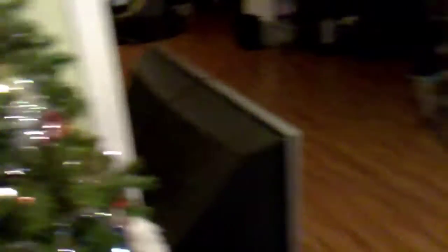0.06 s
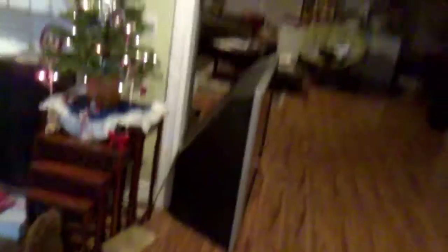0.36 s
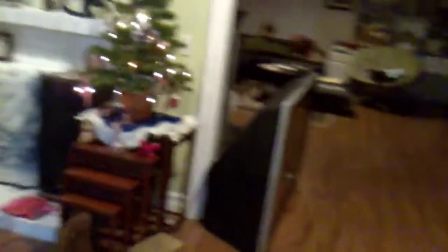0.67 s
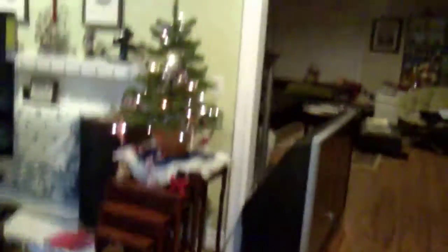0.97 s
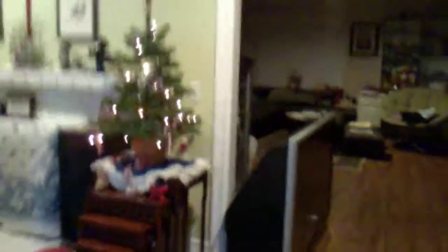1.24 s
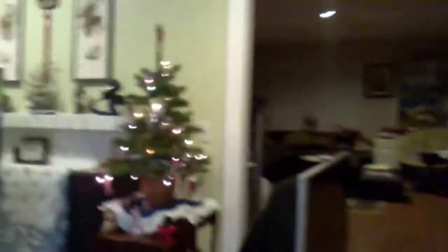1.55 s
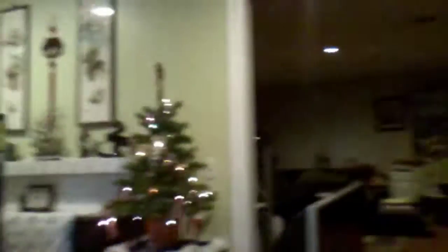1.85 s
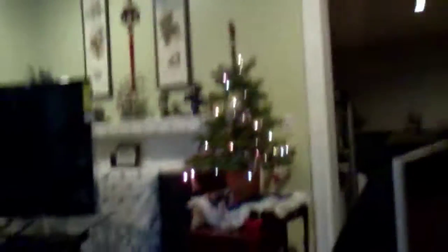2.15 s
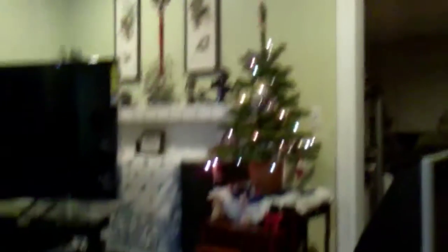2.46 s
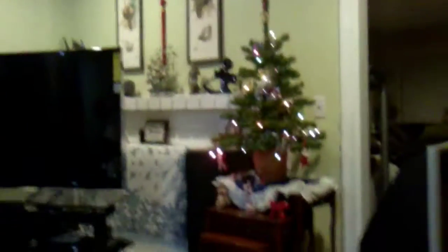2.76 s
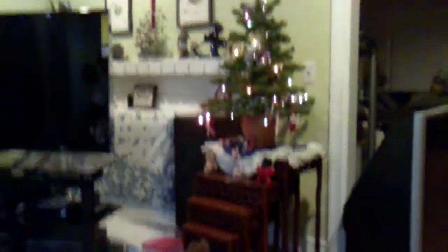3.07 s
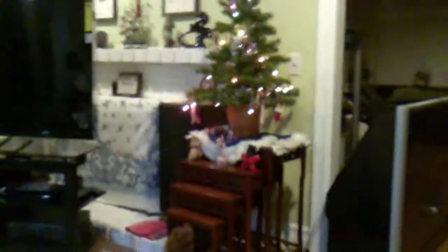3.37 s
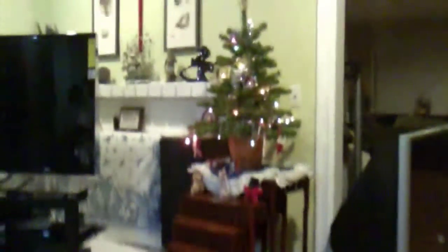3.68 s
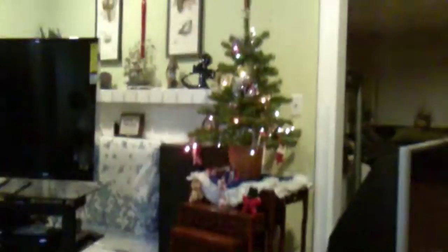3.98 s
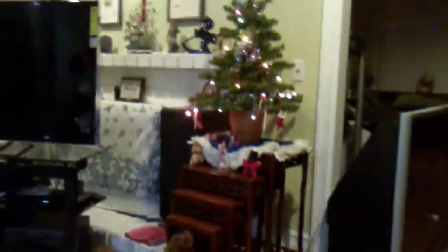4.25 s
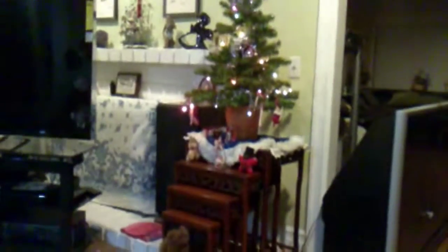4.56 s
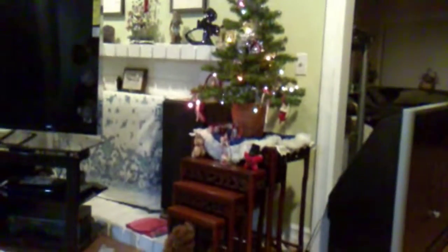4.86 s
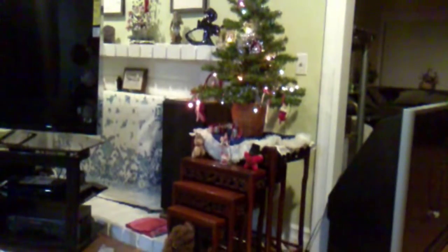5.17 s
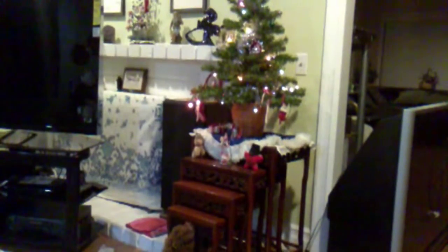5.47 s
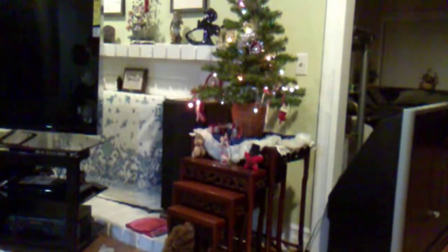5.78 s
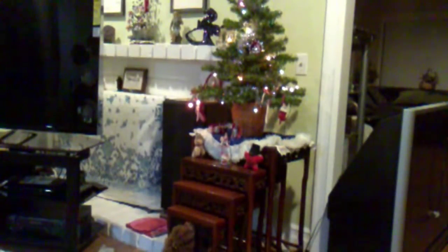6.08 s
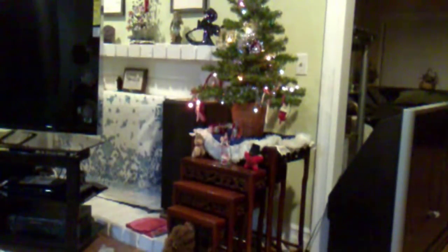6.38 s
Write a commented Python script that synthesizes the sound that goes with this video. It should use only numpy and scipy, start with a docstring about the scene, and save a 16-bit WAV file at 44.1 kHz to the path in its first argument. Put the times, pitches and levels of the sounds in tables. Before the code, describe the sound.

Close handling noise on a small camera: sharp plastic clicks, creaks, skin rubbing and soft bumps, fading to faint hiss.

```python
"""The plastic case of a small camera creaks and snaps as fingers shift their grip in a quiet room.
Each time a seam sticks and lets go, it taps the case and makes it ring; a loose part ticks at the start.
Skin slides over the case with a grainy rub, a hiss and a low rumble, and soft bumps of the hand push
on the microphone inside. Then the hand comes to rest and only a faint hiss is left."""
import sys
import numpy as np
from scipy import signal
from scipy.fft import rfft, irfft
from scipy.io import wavfile

SR = 44100
rng = np.random.default_rng(int(sys.argv[2]) if len(sys.argv) > 2 else 0)


def output_pcm(signal):
    """Save a mono or channel-first signal as 16-bit PCM at the path in sys.argv[1].

    Samples are clipped to [-1, 1] before scaling.
    """
    pcm = np.clip(np.atleast_2d(signal).T, -1, 1) * 32767
    wavfile.write(sys.argv[1], SR, np.round(pcm).astype(np.int16))


N = 283465

# Levels in the tables are relative: the functions scale and filter them further.
# tone colour of the still room with the microphone's own hiss: f/Hz, level/dB
STILL_SPECTRUM = [(20, 1.5), (60, -17), (150, -17), (260, -17.5), (430, -21.5), (750, -24), (1150, -23),
                  (1500, -28), (3000, -29.5), (8000, -29), (16000, -27.5)]
# tone colour of the grip's rumble: f/Hz, level/dB
GRIP_SPECTRUM = [(20, -4), (40, 1), (90, 1), (150, -4), (230, -7.5), (340, -12), (600, -37)]
# tone colour of sliding skin: f/Hz, level/dB
SKIN_SPECTRUM = [(1200, -17.5), (2200, -0.5), (3000, -1.5), (4200, -4), (5200, -5), (7000, -7), (9000, -9),
                 (10800, -10.5), (13000, -13.5), (16000, -22.5)]
# the holding hand, until it comes to rest: t/s, rub level/dB, rumble level/dB
HOLDING_HAND = [(0.0, -85, -83), (0.45, -73, -68), (0.8, -55.5, -50), (1.2, -64.5, -76), (2.0, -60.5, -63),
                (2.82, -71, -69.5), (3.35, -78, -60), (3.8, -77, -66.5), (4.35, -69.5, -60.5),
                (5.0, -74.5, -75), (5.5, -89.5, -85)]
# strokes of a finger over the case: start t/s, length/s, rub level/dB, hiss level/dB
FINGER_STROKES = [(0.174, 0.037, -59, -74), (0.256, 0.054, -58.5, -68), (0.528, 0.084, -57, -61.5),
                  (0.663, 0.28, -50, -59), (0.733, 0.079, -43.5, -79), (0.959, 0.038, -47.5, -50),
                  (1.006, 0.056, -46, -68), (1.054, 0.039, -51, -42.5), (1.106, 0.068, -49.5, -47),
                  (1.175, 0.29, -57, -55.5), (1.523, 0.055, -37.5, -41.5), (1.586, 0.15, -54, -46),
                  (1.624, 0.068, -38.5, -47.5), (1.776, 0.052, -51, -53.5), (1.878, 0.18, -43.5, -55),
                  (1.919, 0.028, -61, -47.5), (2.005, 0.03, -44.5, -47.5), (2.072, 0.21, -47.5, -55),
                  (2.348, 0.066, -49.5, -64), (2.436, 0.12, -44.5, -54), (2.665, 0.046, -49, -57.5),
                  (2.738, 0.041, -54, -60), (2.923, 0.028, -57, -71), (3.305, 0.024, -62, -70.5),
                  (3.534, 0.023, -47, -60), (3.559, 0.11, -57.5, -59.5), (3.87, 0.14, -58, -71),
                  (4.095, 0.034, -65.5, -72), (4.167, 0.018, -56, -64), (4.396, 0.07, -71, -92),
                  (4.76, 0.074, -61.5, -66), (4.813, 0.032, -59, -72), (4.92, 0.035, -71.5, -75),
                  (5.125, 0.027, -66.5, -68), (5.204, 0.04, -70, -72)]
# soft bumps of the hand: t/s, level/dB, f/Hz, swell time/s
HAND_BUMPS = [(0.262, -41, 59, 0.0039), (0.412, -44, 51, 0.008), (0.829, -33.5, 75.4, 0.0051),
              (0.958, -31.5, 41.3, 0.0079), (1.524, -17, 43, 0.013), (1.935, -35, 90, 0.0038),
              (3.467, -28, 90, 0.0067), (3.491, -36.5, 76.9, 0.012), (3.959, -44, 124.5, 0.0047),
              (4.368, -42, 80, 0.0045), (4.615, -44, 114, 0.006), (4.694, -43.5, 120, 0.0075),
              (5.224, -43.5, 123, 0.0054), (5.782, -43, 406, 0.00088), (5.782, -55.5, 236, 0.0074)]
# squeaky rasps of dry skin: start t/s, end t/s, f/Hz, width/Hz, level/dB
SKIN_RASPS = [(1.042, 1.122, 4170, 804, -50.5), (1.128, 1.245, 4180, 800, -56.5),
              (1.307, 1.5, 10500, 2190, -64), (1.649, 1.767, 3580, 604, -48.5),
              (1.643, 1.743, 10900, 1200, -56), (1.789, 1.849, 11100, 2485, -63)]
# the pitches at which the case rings (its modes; wider ones die sooner): f/Hz, width/Hz, level/dB
CASE_MODES = [(120, 198, -4), (336, 350, -6.5), (686, 182, 1.5), (1137, 240, 0.5), (1600, 614, -4),
              (2415, 680, -3.5), (3880, 1300, -7.5), (5960, 4200, -13.5), (10700, 3300, -14.5)]
# ticks of a loose part: t/s
TICK_TIMES = [0.0433, 0.077, 0.1496, 0.2258, 0.2739, 0.292, 0.3098, 0.3283, 0.3663, 0.3993, 0.4358, 0.4773,
              0.4963]
# slips of a stiff catch: t/s, level/dB
CATCH_SLIPS = [(0.888, -17.5), (2.1363, -19), (2.146, -16), (2.1501, -18), (2.1638, -24), (2.1883, -13),
               (2.2422, -18.5), (2.3547, -5.5), (2.367, -11), (2.3767, -7.5), (2.3853, -7.5), (2.542, -17),
               (2.9508, -31.5), (4.37, -25)]
# Sharpness, below, is the frequency above which a tap loses its treble.
# dry clicks of the seam: t/s, level/dB, sharpness/Hz
SEAM_CLICKS = [(0.91, -2, 3200), (1.1566, -4, 9000), (1.3168, -7.5, 1600), (1.4978, -12.5, 3120),
               (1.8345, 4, 7040), (1.877, -4.5, 7800), (2.0886, -1.5, 6800), (2.564, -3, 4300),
               (2.6142, -12, 6700), (3.0069, -8, 5500), (3.028, 6.5, 4700), (3.3875, -20, 5500),
               (3.4529, -10, 10000), (3.4903, 4, 9200), (3.6418, 3, 4700), (3.6791, -3.5, 2200),
               (3.7248, -14.5, 4800), (3.8623, 6.5, 5330), (4.05, -4, 4280), (4.154, -2.5, 5200),
               (4.2782, 0, 4900), (4.3081, -1.5, 4500), (4.4794, -0.5, 4200), (4.534, -3, 3500),
               (4.696, -24, 3000)]
# creaks, quick runs of slips:
# start t/s, end t/s, first slip rate/Hz, last slip rate/Hz, level/dB, sharpness/Hz, favoured f/Hz
SEAM_CREAKS = [(0.77, 0.805, 160, 140, -13, 3970, 2696), (1.243, 1.266, 233, 310, -15.5, 1480, 900),
               (1.573, 1.579, 81, 100, -21, 6000, 2400), (1.667, 1.704, 132, 130, -6, 3000, 500),
               (1.886, 1.908, 110, 135, -14, 6000, 1700), (2.094, 2.128, 119, 117, -7.5, 7640, 4030),
               (2.432, 2.515, 107, 98, -6.5, 4640, 2614), (3.134, 3.189, 76, 65, -29, 4500, 2580),
               (4.397, 4.438, 107, 130, -27.5, 3960, 1000), (4.44, 4.47, 115, 130, -21.5, 4800, 2700),
               (4.478, 4.517, 110, 85, -26.5, 4880, 2800)]
# snaps and hollow knocks around the case:
# t/s, level/dB, sharpness/Hz, favoured f/Hz, its boost/dB, bass boost from flexing/dB
CASE_SNAPS = [(0.627, -2.5, 1974, 560, 4.5, 3.5), (0.6536, -2, 4090, 590, 12, 11.5),
              (0.675, 7, 7000, 1540, 14.5, 13), (0.678, -1.5, 2000, 744, 13, 3.5),
              (0.695, -11, 3000, 800, 9.5, 4.5), (0.714, 14.5, 2500, 410, 10, 3.5),
              (0.7181, -2.5, 7150, 520, 14, 11), (0.7294, 7.5, 2860, 555, 10, 8.5),
              (0.7377, -8, 5880, 820, 12, 20), (0.829, 5, 9500, 4830, 4.5, -3),
              (0.879, -5.5, 2890, 2740, 10, -3), (0.9573, 11, 9910, 910, 10.5, 0),
              (1.5462, -1.5, 12100, 2140, 1, 8), (1.5538, 2, 12160, 1080, 1, 7),
              (1.5604, 4, 4680, 1640, 10.5, 6), (1.6164, -0.5, 8780, 450, 10, -10),
              (1.6514, 1, 5700, 523, 9.5, 11), (2.129, -1.5, 2170, 646, 11, -7),
              (2.3398, -3.5, 1040, 850, 15, 15), (2.4232, 11, 10700, 2744, 6, -5),
              (2.4485, -6, 3910, 890, 15, -4), (2.5248, 5, 5800, 2450, 7, -5),
              (2.678, -2.5, 3970, 900, 7.5, -13), (3.4136, -21.5, 4940, 580, 5, 11),
              (3.4675, 9.5, 5800, 4500, 10, 3), (3.4673, 10.5, 1500, 800, 6, 7.5),
              (3.6601, 3.5, 13290, 530, 6.5, 9), (3.662, -10, 9550, 4600, 21.5, 13),
              (3.9568, -5, 8200, 890, 6, 9), (3.959, -1.5, 2960, 530, 10, 3.5),
              (4.607, -16, 6250, 784, 8, 9.5), (4.613, -15, 10220, 657, 8, 15),
              (4.7637, 7.5, 930, 595, 4, 5.5), (5.2273, -26.5, 2302, 798, 13.5, 13),
              (5.783, -31.5, 1014, 443, 13.5, 16)]


def from_db(db):
    """Turn decibels into a factor to multiply by."""
    return 10 ** (np.asarray(db) / 20)


def cut(x, hz, kind, order=2):
    """Filter a sound, keeping the "low" part or a "band"."""
    return signal.sosfilt(signal.butter(order, np.clip(hz, 10, .45 * SR), kind, fs=SR, output="sos"), x)


def rms_one(x):
    """Scale a sound so that its average size (rms) is 1."""
    return x / np.sqrt(np.mean(x ** 2) + 1e-20)


def band_one(x, band_hz):
    """Scale a sound so that the part inside one band has rms 1."""
    return x / np.std(cut(x, band_hz, "band", order=3))


def drift(per_s):
    """A wandering curve of rms 1 that heads for a new random value per_s times a second."""
    targets = rng.standard_normal(N // 20)
    return rms_one(np.interp(np.arange(N) / SR * per_s, np.arange(len(targets)), targets))


def coloured(noise, spectrum):
    """Give a noise the tone colour in a table, at rms 1."""
    hz, db = np.transpose(spectrum)
    bin_hz = np.maximum(np.fft.rfftfreq(N, 1 / SR), 1)
    gain = from_db(np.interp(np.log(bin_hz), np.log(hz), db))
    return rms_one(irfft(rfft(noise) * gain, N))


def add(out, start_s, sound):
    """Mix a short sound in at a given time."""
    at = int(round(start_s * SR))
    out[at:at + len(sound)] += sound[:N - at]


def still_room():
    """The quiet room and the microphone's own hiss make a faint, steady noise."""
    return from_db(-66.5) * coloured(rng.standard_normal(N), STILL_SPECTRUM)


def wall_echo(sound, fade_s=0.16, level_db=-27):
    """A faint, dull tail comes back from the walls, falling by 60 dB in fade_s."""
    t = np.arange(SR // 2) / SR
    tail = rng.standard_normal(len(t)) * from_db(-60 * t / fade_s) * (t > .006)
    tail = cut(tail / np.sqrt(np.sum(tail ** 2)), [400, 6000], "band", order=1)
    return from_db(level_db) * signal.fftconvolve(sound, tail)[:N]


def hand_bumps():
    """Soft flesh presses on the case slowly: a few low waves swell and die."""
    out, t = np.zeros(N), np.arange(SR // 6) / SR
    for start, db, hz, swell_s in HAND_BUMPS:
        envelope = (t / swell_s * np.exp(1 - t / swell_s)) ** 2
        add(out, start, from_db(db) * envelope * np.sin(2 * np.pi * hz * t))
    return out


def stroke_envelope(length_s, rise_s=0.0087, ease_db_per_s=14.5, lift_db_per_s=450.5):
    """Loudness of one stroke: a finger starts to slide at once, eases a little, then lifts."""
    t = np.arange(SR // 2) / SR
    loss_db = ease_db_per_s * t + lift_db_per_s * np.maximum(t - length_s, 0)
    return np.minimum(t / rise_s, 1) * from_db(-loss_db)


def hand_movement(skid_s=0.014):
    """How strong rub, hiss and rumble are over time: holding, strokes and skids add up in power."""
    times, *levels = np.transpose(HOLDING_HAND)
    hold, grip = [from_db(np.interp(np.arange(N) / SR, times, db)) for db in levels]
    rub_power, hiss_power = hold ** 2, (hold * from_db(-5)) ** 2
    # after each seam click the finger skids on: a tiny stroke, far softer than the click
    skids = [(start, skid_s, db - 58, db - 66.5) for start, db, _ in SEAM_CLICKS]
    for start, length_s, rub_db, hiss_db in FINGER_STROKES + skids:
        envelope = stroke_envelope(length_s)
        add(rub_power, start, (from_db(rub_db) * envelope) ** 2)
        add(hiss_power, start, (from_db(hiss_db) * envelope) ** 2)
    rub, hiss = np.sqrt(rub_power), np.sqrt(hiss_power)
    shake = from_db(-52) * (rub / from_db(-50)) ** 0.8   # harder rubbing adds more rumble
    return rub, hiss, np.hypot(grip, shake)


def friction(slips_per_s, spread_db, drag_share):
    """The force of sliding: tiny slips of uneven size over the even noise of dragging."""
    sizes = from_db(spread_db * np.minimum(rng.exponential(1, N), 3)) * rng.choice([-1, 1], N)
    slipping = rng.random(N) < slips_per_s / SR
    return rms_one(sizes * slipping) + drag_share * rng.standard_normal(N)


def finger_echo(sound, delay_s=.0003, echo_share=0.2):
    """Sound bounces off the finger over the microphone hole; as the gap moves, the colour shifts."""
    now = np.arange(N)
    lag = delay_s * SR * np.exp(0.27 * drift(per_s=12))
    return sound + echo_share * np.interp(now - lag, now, sound)


def sliding_skin(rub, hiss, rumble, unsteady_db=1.5):
    """Sliding skin rings the case, hisses over the microphone hole and shakes the whole camera."""
    pressure = from_db(unsteady_db * drift(per_s=110))
    coarse_force = friction(slips_per_s=550, spread_db=3.0, drag_share=.4)
    grains = signal.fftconvolve(coarse_force, case_ring(flex_db=-0.5, detune=0))[:N]
    grains = band_one(cut(grains, 4500, "low"), [500, 2500])
    fine_force = friction(slips_per_s=6500, spread_db=8.0, drag_share=1.2)
    skin = finger_echo(coloured(fine_force, SKIN_SPECTRUM))
    skin = band_one(skin, [4500, 14000])
    grip = coloured(rng.standard_normal(N), GRIP_SPECTRUM)
    return from_db(-2.75) * pressure * rub * grains + from_db(-3.13) * hiss * skin + rumble * grip


def skin_rasps():
    """Dry skin catches and flutters: a narrow band of noise swells and fades."""
    out = np.zeros(N)
    for start, end, hz, width, db in SKIN_RASPS:
        flutter = rms_one(cut(rng.standard_normal(SR // 2), [hz - width / 2, hz + width / 2], "band"))
        swell = signal.windows.tukey(int((end - start) * SR), .5)
        add(out, start, from_db(db) * swell * flutter[:len(swell)])
    return out


def case_ring(flex_db, detune, flex_below_hz=500):
    """After one tap the case rings at several fading pitches; flexing sets how strong the low ones are."""
    t = np.arange(SR // 20) / SR
    hz, width, db = np.transpose(CASE_MODES)[:, :, None]
    gain = from_db(db + flex_db * (hz < flex_below_hz)) * 2 * np.pi * width / SR
    gain[1::2] *= -1   # flipping every other mode makes the lows arrive a little late
    hz = hz * np.exp(detune * rng.standard_normal(hz.shape))   # the grip shifts the pitches each time
    return np.sum(gain * np.exp(-np.pi * width * t) * np.sin(2 * np.pi * hz * t), axis=0)


def snap(db, sharp_hz, spot_hz, spot_db, flex_db, chatter_s=0.0031):
    """A seam lets go in one push, then chatters briefly; the spot that slips favours one pitch."""
    t = np.arange(SR // 50) / SR
    push = cut(1.0 * (t == 0), 8000, "low", order=1)
    chatter = from_db(-28) * rng.standard_normal(len(t)) * np.exp(-t / chatter_s)
    ring = signal.fftconvolve(push + chatter, case_ring(flex_db, detune=.05))
    narrowness = np.clip(6800 / spot_hz, 2, 5.5)   # plastic damps high pitches faster
    spot = signal.lfilter(*signal.iirpeak(spot_hz, narrowness, fs=SR), ring)
    boosted = ring + (from_db(spot_db) - 1) * spot
    return from_db(db) * cut(boosted, sharp_hz, "low", order=3)


def skin_crackles(rub, per_s=18):
    """Now and then sliding skin catches and flicks the case, harder under a harder rub."""
    out, seconds = np.zeros(N), N / SR
    for when, size, spot in rng.random((int(per_s * seconds), 3)):
        db = 32.5 + (2 * size - 1)   # relative to the rub
        spot_hz = 1400 * 2 ** (2 * spot - 1)   # up to an octave either way
        flick = snap(db, sharp_hz=5500, spot_hz=spot_hz, spot_db=4.0, flex_db=5.0)
        add(out, when * seconds, rub[int(when * N)] * flick)
    return out


def loose_part_ticks(full_at_s=0.38, growth_db_per_s=53):
    """A loose part ticks against the case, harder each time until it is at full strength."""
    out = np.zeros(N)
    for start in TICK_TIMES:
        db = -11 - growth_db_per_s * max(full_at_s - start, 0)
        add(out, start, snap(db, sharp_hz=6700, spot_hz=6600, spot_db=5.5, flex_db=-0.5))
    return out


def stiff_catch():
    """A stiff catch slips and rings at one bright pitch."""
    out = np.zeros(N)
    for start, db in CATCH_SLIPS:
        add(out, start, snap(db, sharp_hz=8060, spot_hz=2775, spot_db=21.0, flex_db=3.0))
    return out


def seam_clicks(hollow_hz=3700, hollow_depth=0.5):
    """The seam barely stirs one of the case's pitches, so its clicks sound hollow and boxy."""
    out = np.zeros(N)
    for start, db, sharp_hz in SEAM_CLICKS:
        click = snap(db, sharp_hz, spot_hz=1950, spot_db=4.5, flex_db=1.0)
        weak_band = signal.lfilter(*signal.iirpeak(hollow_hz, Q=1.3, fs=SR), click)
        add(out, start, click - hollow_depth * weak_band)
    return out


def seam_creaks(uneven_db=2.5, jitter=0.049):
    """Under a steady load a seam sticks and lets go at an almost even rate."""
    out = np.zeros(N)
    for start, end, first_rate, last_rate, db, sharp_hz, spot_hz in SEAM_CREAKS:
        now = start
        for size, delay in rng.standard_normal((16, 2)):
            if now < end:
                add(out, now, snap(db + uneven_db * size, sharp_hz, spot_hz, spot_db=6.0, flex_db=-4.5))
            slips_per_s = np.interp(now, [start, end], [first_rate, last_rate])
            now += np.exp(jitter * delay) / slips_per_s
    return out


def case_snaps():
    """As the grip changes, one spot of the case after another slips with a snap or a hollow knock."""
    out = np.zeros(N)
    for start, *slip in CASE_SNAPS:
        add(out, start, snap(*slip))
    return out


def scene():
    """The sounds of case and hand over a still room, in one channel."""
    rub, hiss, rumble = hand_movement()
    plastic = case_snaps() + seam_clicks() + stiff_catch() + loose_part_ticks() + seam_creaks()
    skin = skin_rasps() + skin_crackles(rub) + sliding_skin(rub, hiss, rumble)
    handling = plastic + skin
    return (still_room() + wall_echo(handling) + hand_bumps() + handling)[None]


def record(dry):
    """The highest treble, above 16200 Hz, is cut steeply."""
    return signal.sosfilt(signal.ellip(10, .1, 70, 16200, fs=SR, output="sos"), dry)


dry = scene()
out = record(dry)
output_pcm(out)
```